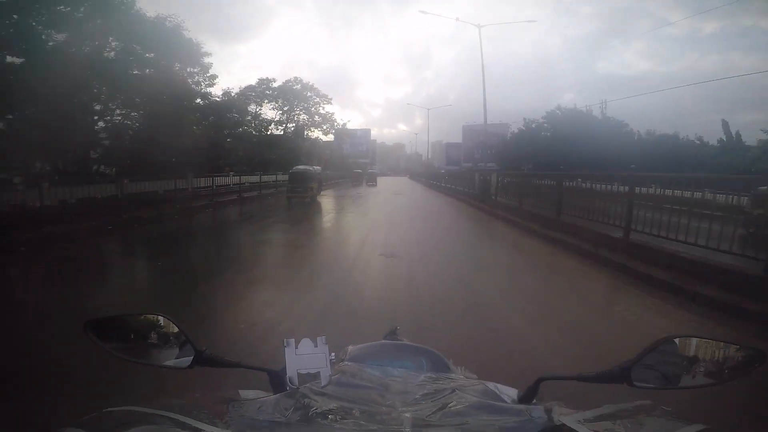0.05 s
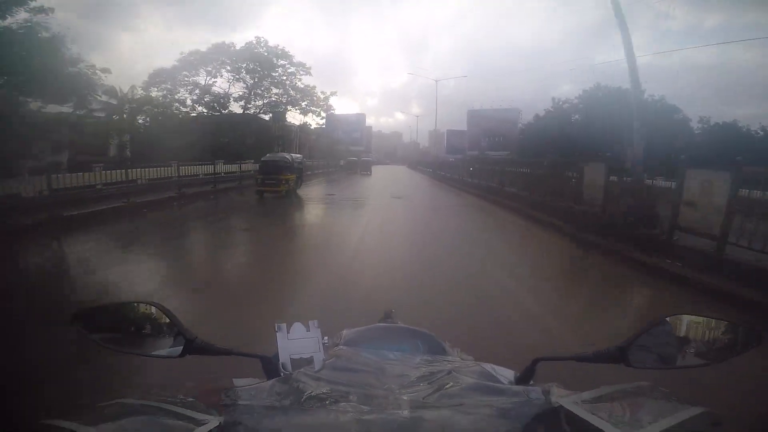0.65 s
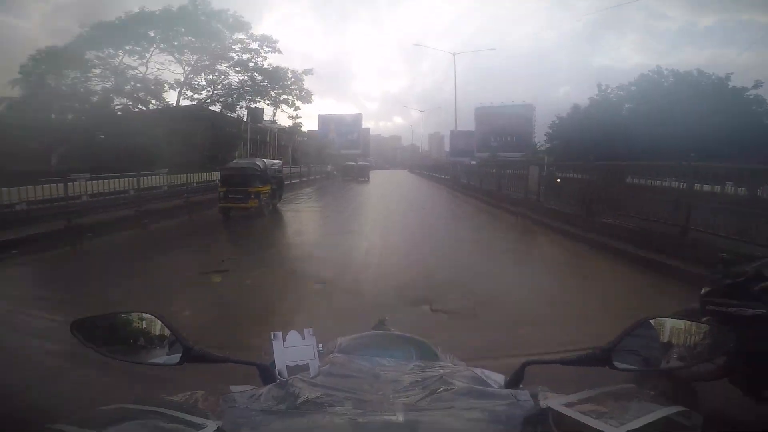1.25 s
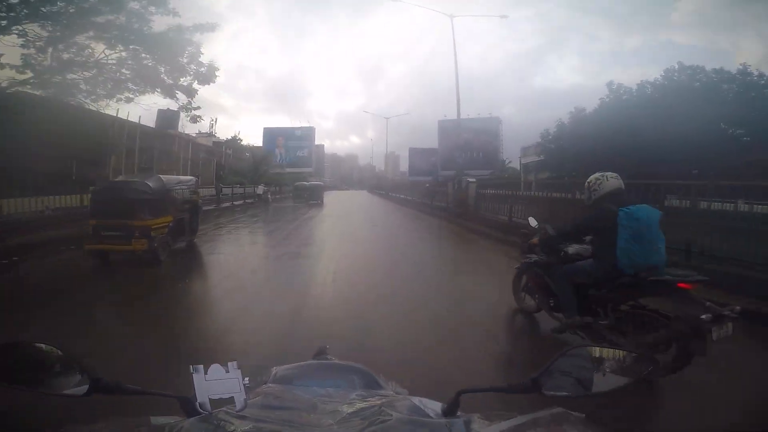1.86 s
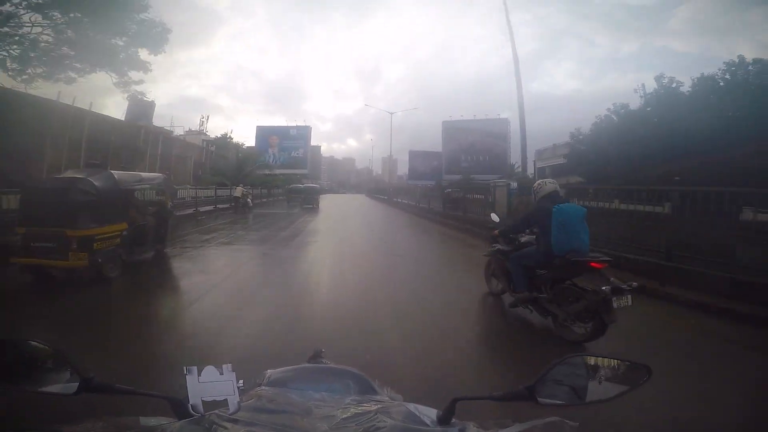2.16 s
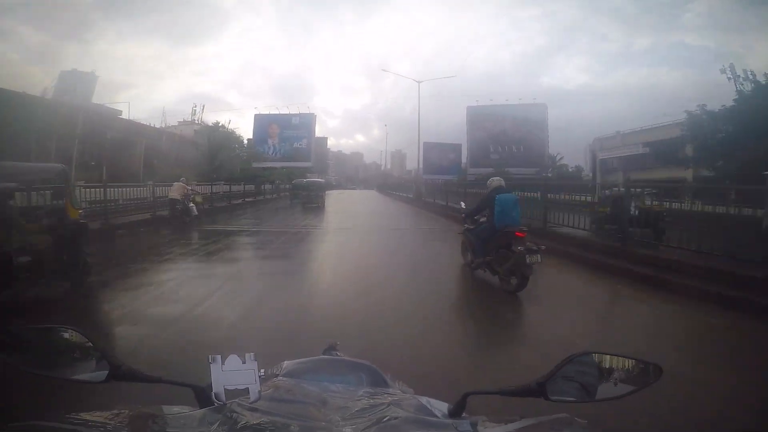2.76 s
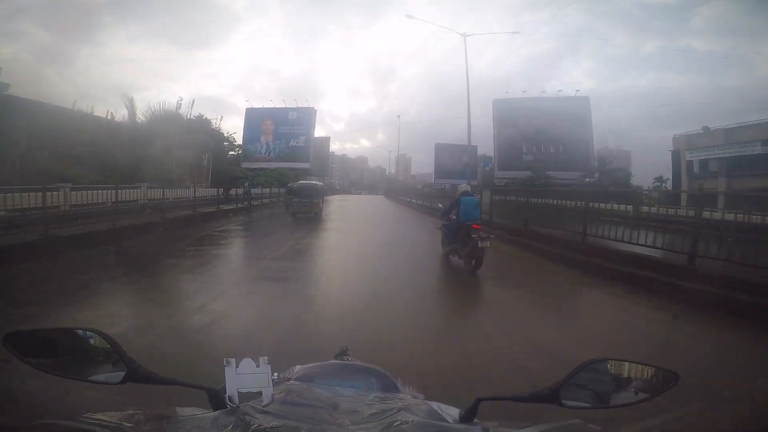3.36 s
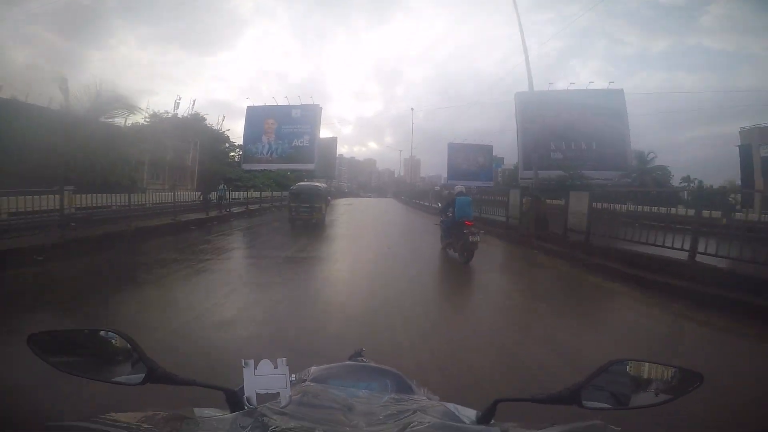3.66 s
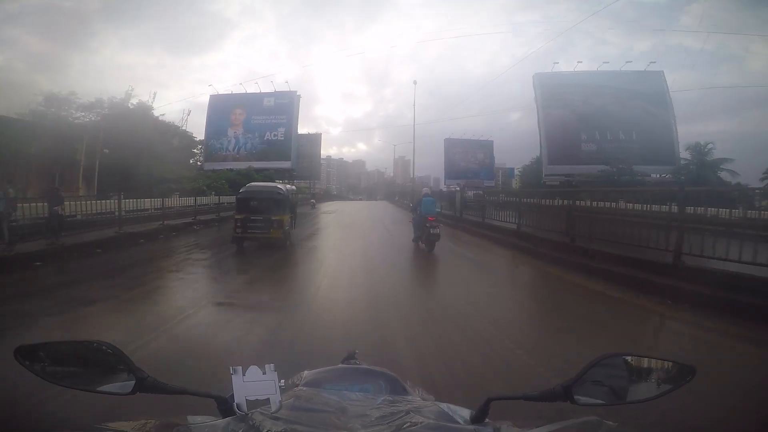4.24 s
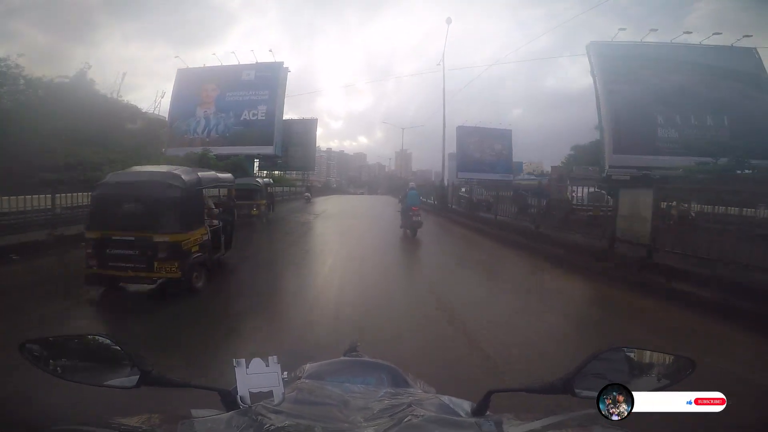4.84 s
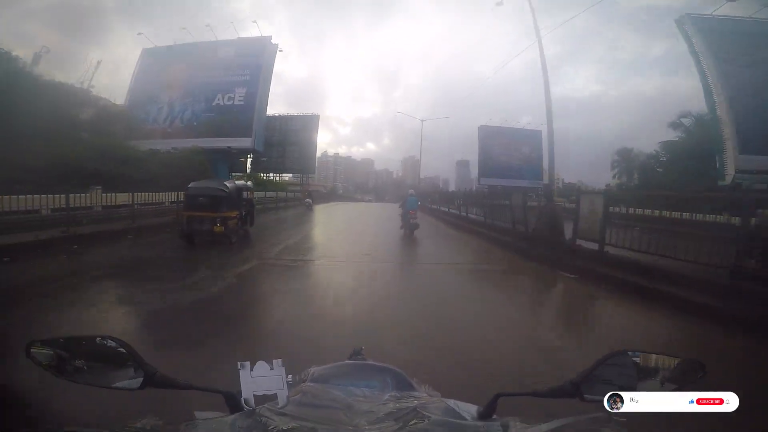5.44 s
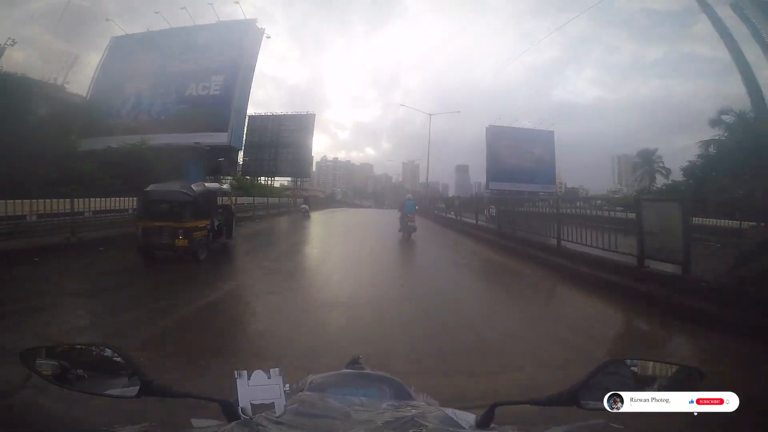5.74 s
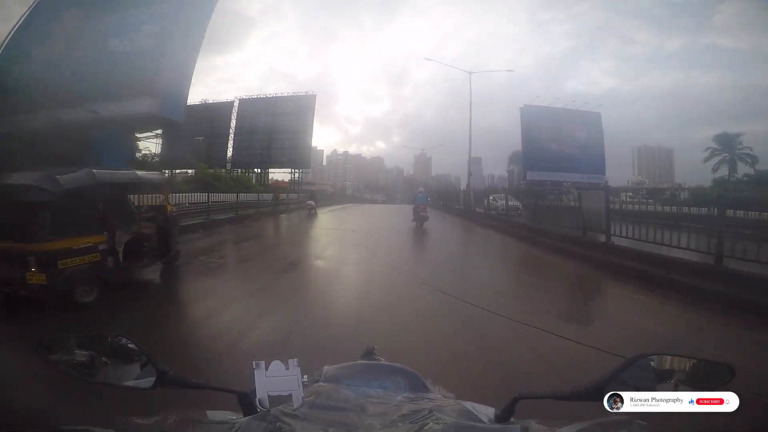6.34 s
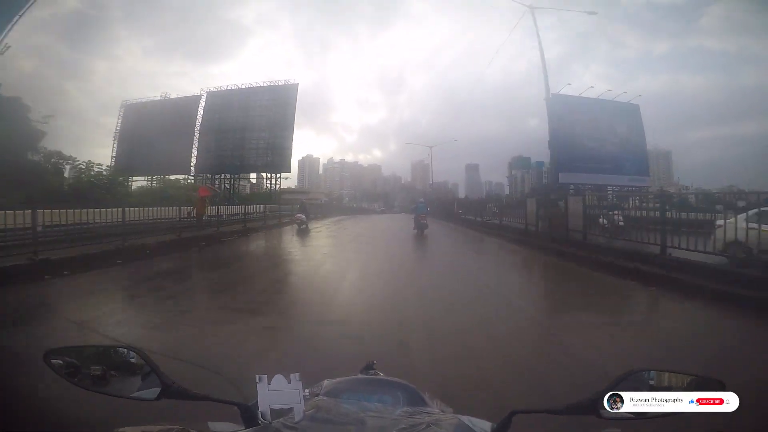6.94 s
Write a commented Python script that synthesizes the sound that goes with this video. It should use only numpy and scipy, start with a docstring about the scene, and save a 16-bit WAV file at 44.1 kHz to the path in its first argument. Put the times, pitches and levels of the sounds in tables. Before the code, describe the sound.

Wind rumbles steadily on a microphone above the handlebars of a motorbike riding along a wet city road. Gusts add a hollow hum and a fluttering rush, while the engine throbs low and the tyres hiss softly through water. About two seconds in, a hard slap of wind hits, followed by smaller thumps and brief rattles of the mount as another motorbike's tyres roar faintly. The gusts then build again.

```python
"""Wind beats on a microphone carried above the handlebars of a motorbike on a wet city road.
Swirls of air make it rumble; air rushing past its two openings (ports) hisses, hums and slaps them.
Underneath, the engine throbs and jolts rattle the microphone's mount. The tyres squeeze water off the
road and throw hissing spray, while other tyres roar and howl nearby. A limiter, which turns down
sounds that are too loud, makes everything dip briefly after the hardest slap."""
import sys
import numpy as np
from scipy import signal
from scipy.fft import rfft, irfft, next_fast_len
from scipy.io import wavfile
from scipy.ndimage import uniform_filter1d, minimum_filter1d

SR = 44100
rng = np.random.default_rng(int(sys.argv[2]) if len(sys.argv) > 2 else 0)


def master_out(mix):
    """Clip the mix to full scale and print it as 16-bit PCM to the path in sys.argv[1]."""
    frames = np.transpose(np.atleast_2d(mix))
    ceiling = np.clip(frames, -1, 1)
    pcm = np.round(ceiling * 32767).astype(np.int16)
    wavfile.write(sys.argv[1], SR, pcm)


N = 308655
OPPOSED = np.array([[1], [-1]])   # pushes the left channel while it pulls the right


def from_db(db):
    """Turn decibels into a number to multiply by."""
    return 10 ** (np.asarray(db) / 20)


def rms_one(x):
    """Scale a sound so that its average strength (rms) is 1."""
    return x / np.sqrt(np.mean(x ** 2) + 1e-20)


def hit_at_level(x, level_db, span_s=0.018):
    """Give a short sound the energy of a steady one lasting span_s at level_db."""
    return from_db(level_db) * x / np.sqrt(np.sum(x ** 2) / (span_s * SR))


def drift(per_s):
    """A smooth random wobble, about 1 in size, that changes roughly per_s times a second."""
    step, warm_up = 40, 2000   # samples per step; steps thrown away
    r = np.exp(-2 * np.pi * step * per_s / SR)
    slow = signal.lfilter([1], [1, -2 * r, r * r], rng.standard_normal(N // step + warm_up + 2))[warm_up:]
    return np.interp(np.arange(N) / step, np.arange(len(slow)), rms_one(slow))


def swing(rows):
    """Join a table's points in time: one curve per level column, in dB above or below its average."""
    time_s, *columns = np.transpose(rows)
    curves = [np.interp(np.arange(N) / SR, time_s, column) for column in columns]
    return [curve - curve.mean() for curve in curves]


def across_pitch(pitch_hz, values):
    """Join points along the pitch axis, giving a value for every frequency in the sound."""
    bins_hz = np.maximum(np.fft.rfftfreq(next_fast_len(N), 1 / SR), 1)
    return np.interp(np.log(bins_hz), np.log(pitch_hz), values)


def colour(x, points, share=1):
    """Turn pitches up or down by a share of a (pitch_hz, gain_db) table."""
    size = next_fast_len(N)
    gain = from_db(share * across_pitch(*np.transpose(points)))
    return irfft(rfft(x, size) * gain, size)[..., :N]


def noise(spectrum):
    """Noise of strength 1, shaped by a (pitch_hz, level_db) table and fading fast past its ends."""
    (low_hz, low_db), (high_hz, high_db) = spectrum[0], spectrum[-1]
    closed = [(low_hz / 2, low_db - 50), *spectrum, (high_hz * 2, high_db - 50)]
    return rms_one(colour(rng.standard_normal(N), closed))


def band(x, low_hz, high_hz):
    """Keep the pitches between two edges, at least an octave apart."""
    edges_hz = [low_hz, max(high_hz, low_hz * 2)]
    return signal.sosfilt(signal.butter(2, edges_hz, "band", fs=SR, output="sos"), x)


def low_pass(x, edge_hz):
    """Dull a sound by cutting the pitches above edge_hz."""
    return signal.sosfilt(signal.butter(4, edge_hz, fs=SR, output="sos"), x)


def resonate(x, hz, width_hz):
    """Make a sound ring at one pitch; a smaller width rings longer."""
    r = np.exp(-np.pi * width_hz / SR)
    feedback = [1, -2 * r * np.cos(2 * np.pi * hz / SR), r * r]
    return signal.lfilter(np.array([1, 0, -1]) * (1 - r * r) / 2, feedback, x)


def breathy_tone(x, hz, width_hz):
    """Ring noise twice at one pitch, leaving a breathy tone of strength 1."""
    return rms_one(resonate(resonate(x, hz, width_hz), hz, width_hz))


def pan(left_db):
    """Left and right gains that make the left louder by left_db."""
    return from_db(OPPOSED * left_db / 2)


# How the tyre roar of a motorbike alongside rises and falls: time_s, relative_db
ROAR_SWELL = [(0.0, -59), (1.2, -55), (1.7, -37.5), (1.88, -31), (2.1, -45), (2.25, -42), (2.4, -33.5),
              (2.6, -41), (2.95, -38.5), (3.3, -33.5), (3.6, -57), (7.0, -62)]
# The tone of that roar: pitch_hz, level_db
ROAR_SPECTRUM = [(450, -9), (530, 3), (620, -6), (740, -10), (850, -1), (950, -4), (1200, 0), (1300, -8)]
# How the tyre howl of passing vehicles rises and falls: time_s, relative_db
HOWL_SWELL = [(0.0, -53), (1.5, -50), (2.3, -46), (3.0, -36), (3.7, -43), (4.9, -44), (5.5, -40),
              (6.1, -38), (6.6, -37), (7.0, -38)]


def traffic(roar_db=-48.5, howl_db=-44, howl_hz=1960, howl_width_hz=190):
    """Other tyres: the motorbike alongside roars, and passing vehicles add a thin howl."""
    roar_swell_db, = swing(ROAR_SWELL)
    howl_swell_db, = swing(HOWL_SWELL)
    roar = noise(ROAR_SPECTRUM) * from_db(roar_db + roar_swell_db)
    howl = breathy_tone(rng.standard_normal(N), howl_hz, howl_width_hz) * from_db(howl_db + howl_swell_db)
    return (roar + howl) * OPPOSED * pan(left_db=3.5)


# Jolts that rattle the mount: time_s, level_db
JOLTS = [(0.107, -19), (2.309, -26), (2.472, -27), (2.488, -19), (2.698, -22), (2.711, -28), (3.243, -23)]
# The notes the mount rings with: pitch_hz, width_hz, gain_db
MOUNT_RINGS = [(794, 210, 1.5), (1070, 220, 6)]


def rattles(click_s=0.0054, dull_hz=1170):
    """The hardest jolts shake the mount: a moment of dull chatter with a short, dry ring."""
    out, t = np.zeros(N), np.arange(SR // 10) / SR
    middle_s = t[-1] / 2
    for time_s, level_db in JOLTS:
        chatter = rng.standard_normal(len(t)) * np.exp(-.5 * ((t - middle_s) / click_s) ** 2)
        ring = sum((-1) ** k * from_db(gain_db) * resonate(chatter, hz, width_hz)
                   for k, (hz, width_hz, gain_db) in enumerate(MOUNT_RINGS))
        start = round((time_s - middle_s) * SR)
        out[start:start + len(t)] += hit_at_level(low_pass(ring, dull_hz), level_db)
    return out * OPPOSED * pan(left_db=2.5)


def splash(drops_per_s=2500, size_spread_db=2.0, ticks_db=-8.0):
    """Water leaving the tyres: a smooth hiss mixed with the ticks of flung drops."""
    sizes = from_db(size_spread_db * np.minimum(rng.exponential(1, N), 5)) * rng.choice([-1, 1], N)
    ticks = rms_one(sizes * (rng.random(N) < drops_per_s / SR))
    return rms_one(rng.standard_normal(N) + from_db(ticks_db) * ticks)


# How the ports colour tyre noise. Mid is what left and right share, side is how they differ; the side
# copies some of the mid, in step or a quarter of a wave off:
# pitch_hz, mid_db, side_db, in_step_share, off_step_share
PORT_COLOUR = [(800, -80.0, -74.0, 0.0, 0.3), (920, -72.5, -62.0, 0.4, 0.3), (1150, -72.0, -59.5, 0.6, 0.5),
               (1290, -74.5, -67.0, 0.2, 0.2), (1400, -69.5, -61.5, 0.5, -0.2),
               (1520, -66.0, -66.0, -0.4, -0.6), (1750, -72.5, -64.0, -0.2, -0.6),
               (1970, -70.0, -62.5, 0.4, -0.7), (2200, -73.0, -71.0, 0.1, -0.2),
               (2340, -70.5, -75.0, -0.1, 0.0), (2480, -77.0, -76.5, 0.0, -0.4),
               (2680, -74.0, -70.5, 0.6, -0.5), (2900, -77.5, -73.0, 0.4, -0.0),
               (3120, -72.5, -75.0, 0.6, -0.5), (3420, -75.5, -75.0, 0.8, 0.2),
               (3620, -80.5, -83.5, -0.1, 0.1), (3950, -80.5, -79.5, 0.6, -0.3),
               (4300, -82.5, -77.5, 0.4, -0.0), (4650, -85.5, -81.5, 0.4, 0.2),
               (5150, -81.5, -80.5, 0.7, 0.2), (5500, -76.5, -76.5, 0.7, 0.2),
               (5750, -77.0, -75.5, 0.1, -0.1), (6300, -73.5, -70.5, 0.2, -0.7),
               (6900, -80.0, -81.0, 0.2, -0.3), (7600, -85.0, -85.0, 0.2, -0.4),
               (8500, -87.0, -88.0, -0.1, -0.1), (9900, -92.5, -96.5, 0.2, 0.0),
               (11000, -105.0, -105.0, 0.2, -0.0), (13400, -111.0, -109.0, -0.1, 0.0)]


def at_ports(shared, own):
    """Turn two noises into left and right, as the two ports hear them: partly alike, partly not."""
    size = next_fast_len(N)
    pitch_hz, *columns = np.transpose(PORT_COLOUR)
    mid_db, side_db, in_step, off_step = [across_pitch(pitch_hz, column) for column in columns]
    likeness = in_step + 1j * off_step
    shared, own = rfft([shared, own], size) * np.sqrt(SR / 2)
    side = likeness * shared + np.sqrt(np.maximum(1 - np.abs(likeness) ** 2, 0)) * own
    return irfft(shared * from_db(mid_db) + side * from_db(side_db) * OPPOSED, size)[:, :N]


# Tyre noise as the water on the road deepens and thins: time_s, wash_relative_db, spray_relative_db
ROAD_WETNESS = [(0.0, -28, -37), (0.35, -28, -35.5), (0.75, -26.5, -33), (1.1, -25.5, -30),
                (1.4, -25.5, -29), (1.6, -25, -28.5), (1.87, -26, -28), (2.1, -27, -30), (2.5, -28, -32),
                (2.95, -26, -31.5), (3.65, -26.5, -32), (4.1, -25.5, -32.5), (4.3, -25, -31),
                (4.55, -25, -30.5), (4.9, -23.5, -30.5), (5.2, -24.5, -31), (5.38, -27, -35),
                (5.7, -27, -36), (6.15, -26.5, -34.5), (6.5, -27, -34), (6.66, -26, -33.5),
                (6.82, -28, -37.5), (7.0, -27, -36.3)]
# Narrow, hollow rings of the microphone's housing: pitch_hz, width_hz, gain_db
HOUSING_RINGS = [(1545, 68, -10.5), (3100, 144, -13.5), (6380, 88, -12.5), (8500, 220, -21)]
# The wash fades at high pitches, where the spray takes over: pitch_hz, gain_db
WASH_FADE = [(3100, 0), (4800, -13.5)]


def tyres(wash_gain_db=-0.38, spray_gain_db=-1.1, surge_db=0.77):
    """Tyres squeeze water off the road in a broad wash and throw up fine spray; the housing rings along."""
    wash_swell_db, spray_swell_db = swing(ROAD_WETNESS)
    water = at_ports(splash(), splash()) * from_db(surge_db * drift(15.5))
    water = water + sum(from_db(db) * resonate(water, hz, width_hz) for hz, width_hz, db in HOUSING_RINGS)
    wash = colour(water, WASH_FADE)
    spray = water - wash
    return wash * from_db(wash_gain_db + wash_swell_db) + spray * from_db(spray_gain_db + spray_swell_db)


# How hard the engine's firing shakes the mount: time_s, relative_db
ENGINE_SHAKE = [(0.0, -15.5), (0.2, -17), (0.65, -15.5), (1.15, -19), (1.55, -18), (2.15, -26), (3.1, -18),
                (3.2, -26), (3.6, -10.5), (3.85, -24), (3.95, -17), (6.25, -21), (6.35, -14.5), (7.0, -40)]


def engine(firing_hz=29.0, wander=0.0442, firing_db=-25.5, crank_db=-29.0, uneven_db=3.0):
    """One cylinder shakes the mount each time it fires, and its crank does so twice as often."""
    shake_db, = swing(ENGINE_SHAKE)
    phase = 2 * np.pi * np.cumsum(firing_hz * (1 + wander * drift(4.06))) / SR
    # Left and right shake a little out of step.
    firing = rms_one(np.sin(phase + OPPOSED * .4)) * from_db(firing_db + 1.37 * shake_db)
    crank = rms_one(np.sin(2 * phase + OPPOSED * 1.07)) * from_db(crank_db)
    return (firing + crank) * from_db(uneven_db * drift(4.7))


# How the wind's rumble rises and falls: time_s, relative_db
RUMBLE_SWELL = [(0.0, -18), (1.2, -17.5), (1.7, -17.5), (2.6, -18), (3.2, -19), (4.3, -17.5), (6.2, -16.5),
                (6.75, -15.5), (7.0, -14)]
# The tone of the big swirls of air: pitch_hz, level_db
BIG_SWIRLS = [(10, -10), (20, 4), (31, 0), (41, -4.5), (54, 3), (66, 1), (110, 0.5), (130, -4.5),
              (165, -13), (192, -9.5), (228, -21), (400, -29.5)]
# The tone of the small swirls: pitch_hz, level_db
SMALL_SWIRLS = [(12, -16), (25, -3), (44, -8), (62, -3), (80, -3), (100, 1), (125, -.5), (155, -4),
                (240, -20)]


def rumble(gust_db, big_db=-17.5, small_db=-23.0, waver_db=0.5):
    """Big swirls of air press on both ports alike; small ones push one and pull the other."""
    swell_db, = swing(RUMBLE_SWELL)
    big = noise(BIG_SWIRLS) * from_db(big_db + swell_db + 0.085 * gust_db)
    small = noise(SMALL_SWIRLS) * from_db(small_db + waver_db * drift(9.2))
    return (big + small * OPPOSED) * pan(left_db=3.0)


# The lower and upper notes of the air around the housing: pitch_hz, width_hz, average_db
HUM_NOTES = [(193, 44, -22), (329.6, 67, -24)]
# How the lower note rises and falls: time_s, relative_db
LOW_HUM_SWELL = [(0.0, -22), (0.22, -28), (0.33, -11), (0.6, -13.5), (0.87, -23.5), (1.08, -8),
                 (1.27, -16.5), (1.47, -9), (1.68, -22), (2.5, -27), (3.4, -26), (3.6, -18), (3.96, -10),
                 (4.08, -21.5), (4.42, -21), (4.56, -11.5), (4.78, -14.5), (5.25, -13), (5.55, -6.5),
                 (5.68, -20), (5.9, -11.5), (6.3, -21), (6.62, -12.5), (7.0, -13)]


def hollow_hum(gust_db, waver_db=1.46):
    """Churning air sounds two hollow notes around the housing; the upper one follows the gusts."""
    churn = rng.standard_normal(N)
    low_swell_db, = swing(LOW_HUM_SWELL)
    swells_db = [low_swell_db, 1.3 * gust_db]
    hum = sum(breathy_tone(churn, hz, width_hz) * from_db(average_db + swell_db)
              for (hz, width_hz, average_db), swell_db in zip(HUM_NOTES, swells_db))
    return hum * from_db(waver_db * drift(5.2)) * OPPOSED


# The tone of air rushing past the ports: pitch_hz, level_db
RUSH_SPECTRUM = [(130, -6), (260, -7), (300, 2), (410, 1), (475, -5), (525, 0), (575, -3), (630, -1.5),
                 (690, -11), (900, -25)]
# The tone of the higher hiss over them: pitch_hz, level_db
HISS_SPECTRUM = [(620, -12), (700, -6), (770, -.5), (820, 0), (880, -4), (950, -13), (1150, -16),
                 (1280, -26), (2500, -40)]


def rushing_air(gust_db, rush_db=-23.5, hiss_db=-30.5, rush_flutter_db=0.7, hiss_flutter_db=1.0):
    """Air crossing the ports makes a fluttering rush and hiss; gusts mostly lift the rush."""
    flutter = np.minimum(drift(37), 2)
    rush = noise(RUSH_SPECTRUM) * from_db(rush_db + 0.47 * gust_db + rush_flutter_db * flutter)
    hiss = noise(HISS_SPECTRUM) * from_db(hiss_db + 0.078 * gust_db + hiss_flutter_db * flutter)
    return (rush + hiss) * OPPOSED


# Sudden blows of wind: time_s, slap_db, slap_top_hz, thump_db, thump_hz
WIND_BLOWS = [(.107, -18.5, 700, -18, 127), (1.93, 1, 530, -2.5, 115), (2.007, -12, 380, -11.5, 146),
              (2.171, -29, 220, -20.5, 177), (2.238, -33, 700, -21, 183), (2.309, -9, 695, -10, 116),
              (2.471, -14, 690, -19.5, 133), (2.489, -12.5, 700, -14, 160), (2.699, -17, 605, -21, 148),
              (2.711, -14.5, 510, -16.5, 182), (2.847, -11.5, 310, -20.5, 201), (3.143, -13, 450, -18, 165),
              (3.241, -13.5, 720, -11.5, 116), (3.429, -21, 200, -16.5, 157)]


def wind_slaps(low_hz=140, dull_hz=600, usual_db=-16.5, usual_width_s=0.0046, thump_rise_s=0.0048):
    """A whirl of air hits the ports: a rough, dull slap between them and a short, ringing thump on both."""
    out, t = np.zeros((2, N)), np.arange(SR // 5) / SR
    middle_s = t[-1] / 2
    age_s = np.maximum(t - middle_s + 0.00418, 0)   # the thump starts just ahead of the listed time
    for time_s, slap_db, top_hz, thump_db, thump_hz in WIND_BLOWS:
        width_s = usual_width_s * 2 ** (-.075 * (slap_db - usual_db))   # a harder slap is over sooner
        burst = rng.standard_normal(len(t)) * np.exp(-.5 * ((t - middle_s + 1 / top_hz) / width_s) ** 2)
        burst = signal.lfilter(*signal.butter(1, dull_hz, fs=SR), burst)
        slap = low_pass(band(burst, low_hz, 2 * top_hz), top_hz)
        thump = age_s * np.exp(-age_s / thump_rise_s) * np.sin(2 * np.pi * (thump_hz * age_s + rng.random()))
        blow = hit_at_level(slap, slap_db) * OPPOSED + hit_at_level(thump, thump_db)
        start = max(round((time_s - middle_s) * SR), 0)
        out[:, start:start + len(t)] += blow
    return out


# How strongly the air streams past the microphone: time_s, relative_db
GUSTS = [(0.0, -15), (0.2, -18.5), (0.35, -12), (0.6, -12.5), (0.8, -19), (1.1, -8.5), (1.25, -18.5),
         (1.45, -7.5), (1.68, -17.5), (1.88, -16), (2.1, -28), (2.6, -29), (3.1, -15), (3.4, -21),
         (3.8, -12.5), (4.1, -18.5), (4.25, -10.5), (4.4, -15), (4.8, -11), (5.35, -7), (5.6, -11.5),
         (5.72, -16), (5.9, -8.5), (6.15, -13), (6.28, -20), (6.6, -11.5), (6.8, -9), (7.0, -12)]
# Roughly how much louder the wind is on the left: pitch_hz, left_db
LEFT_LEAN = [(200, 1.3), (340, 2.3), (530, 2.5), (650, 1.9), (730, .4), (850, .2), (1100, .8)]


def wind():
    """Each gust lifts the rumble, upper hum and rush together; the two ports colour the air differently."""
    gust_db, = swing(GUSTS)
    air = hollow_hum(gust_db) + rushing_air(gust_db)
    deep_rumble = rumble(gust_db)
    left, right = air + wind_slaps()
    leaning = np.array([colour(left, LEFT_LEAN, share=0.22), colour(right, LEFT_LEAN, share=-0.8)])
    return deep_rumble + leaning


def scene():
    """Wind on top of wet tyres, traffic, the engine and the rattling mount."""
    return wind() + tyres() + traffic() + engine() + rattles()


def limiter(x, threshold_db=1.9, release_db_per_s=150, hold_s=0.02, smooth_samples=160):
    """A peak over the threshold turns the volume down at once; it waits briefly, then comes back up."""
    over_db = np.maximum(20 * np.log10(np.abs(x).max(axis=0) + 1e-9) - threshold_db, 0)
    recovery_db = release_db_per_s * np.arange(N) / SR
    cut_db = np.maximum.accumulate(over_db + recovery_db) - recovery_db
    hold = 2 * int(hold_s * SR / 2) + 1
    gain_db = minimum_filter1d(-cut_db, hold, origin=hold // 2 - smooth_samples // 2)
    return x * from_db(uniform_filter1d(gain_db, size=smooth_samples))


def record(dry):
    """Limit the sound, gently round off its tallest peaks and cut the very highest pitches."""
    cutoff_hz = 13600
    limited = limiter(dry)
    rounded = limited / (1 + limited ** 10) ** (1 / 10)
    return signal.sosfilt(signal.ellip(10, .1, 80, cutoff_hz, fs=SR, output="sos"), rounded)


dry = scene()
out = record(dry)
master_out(out)
```